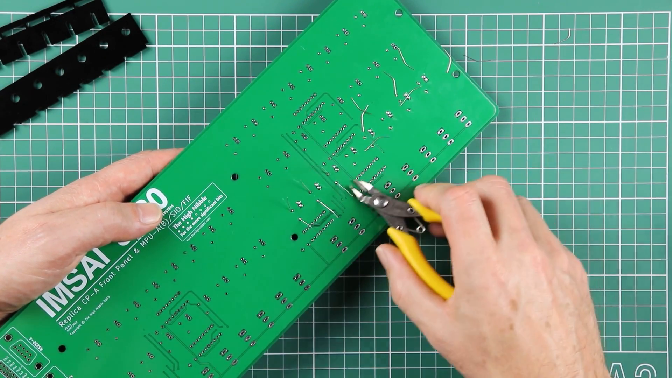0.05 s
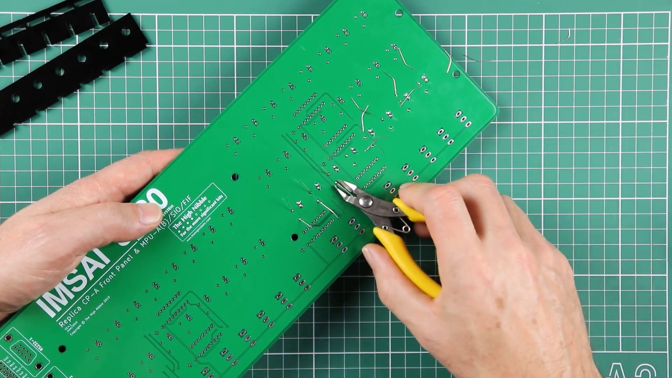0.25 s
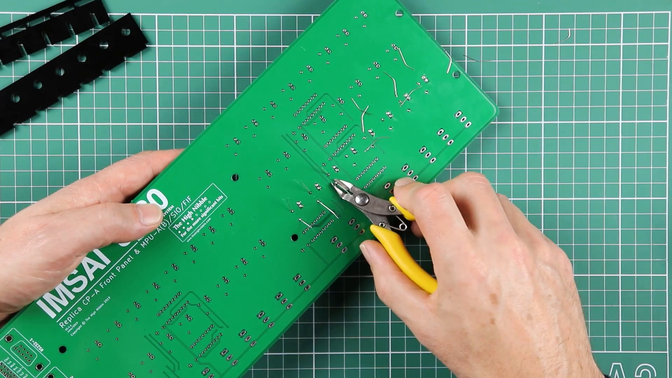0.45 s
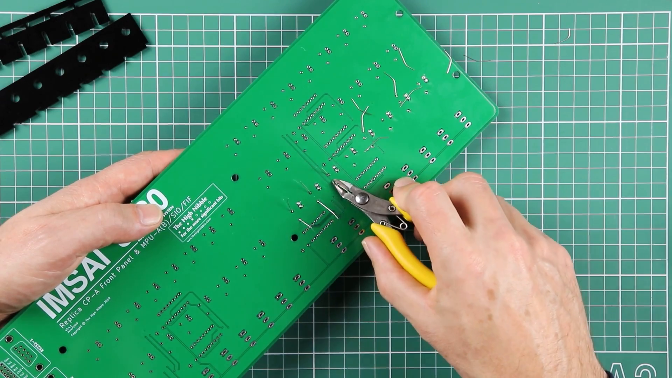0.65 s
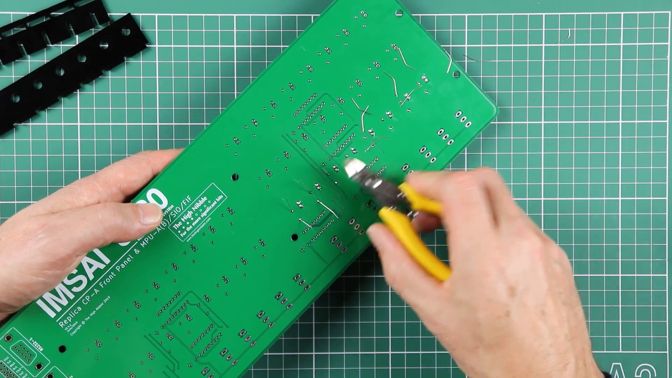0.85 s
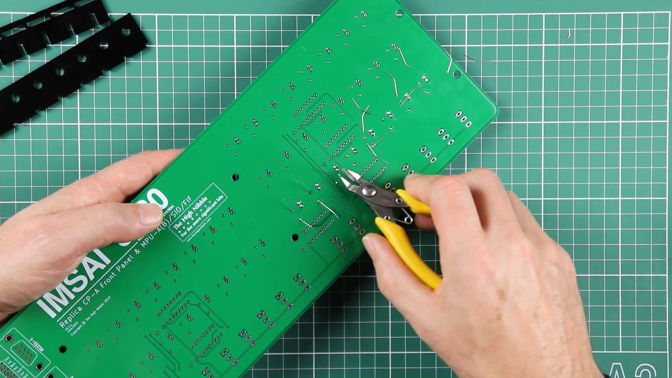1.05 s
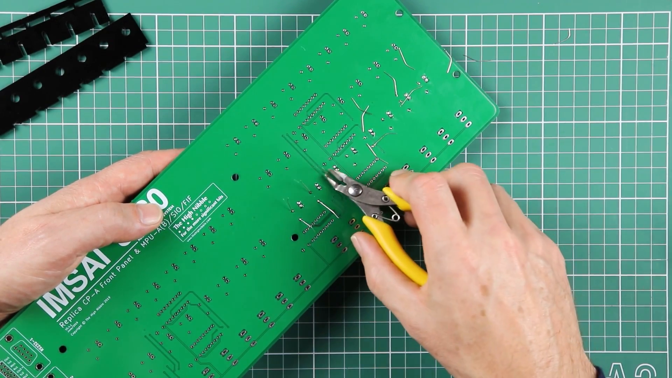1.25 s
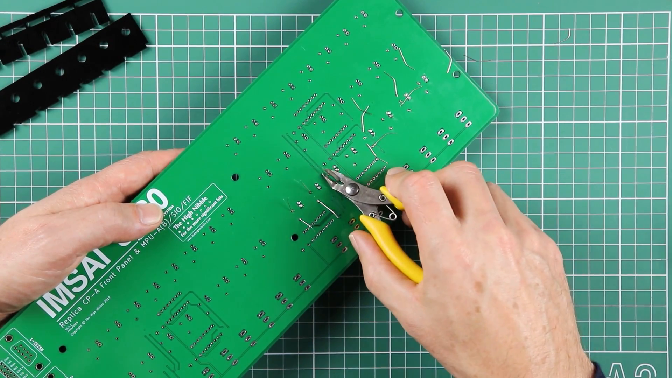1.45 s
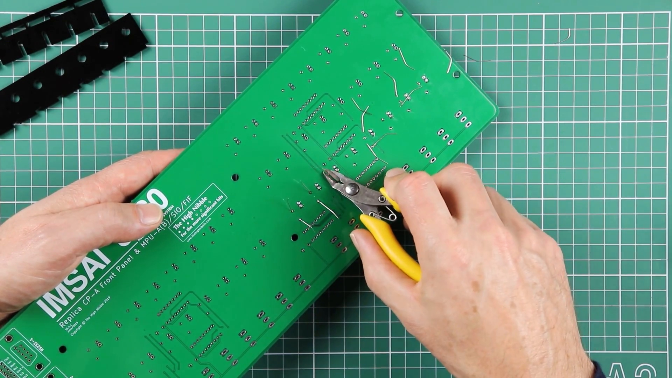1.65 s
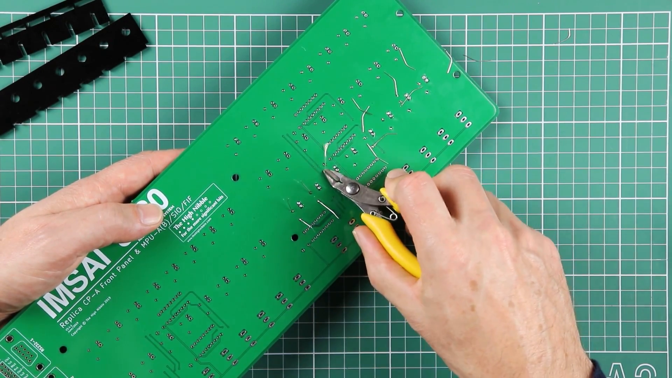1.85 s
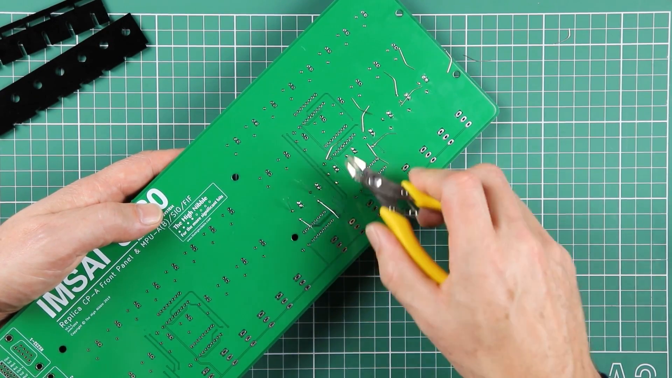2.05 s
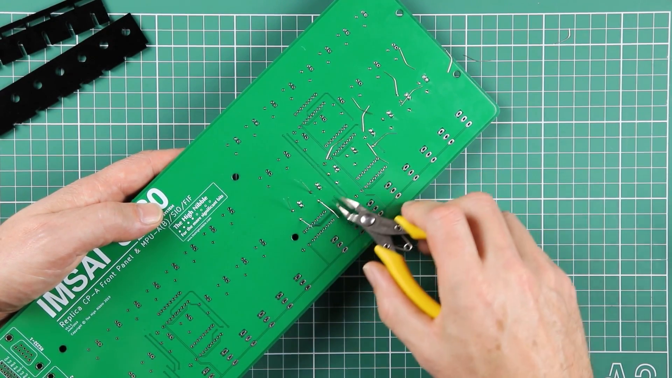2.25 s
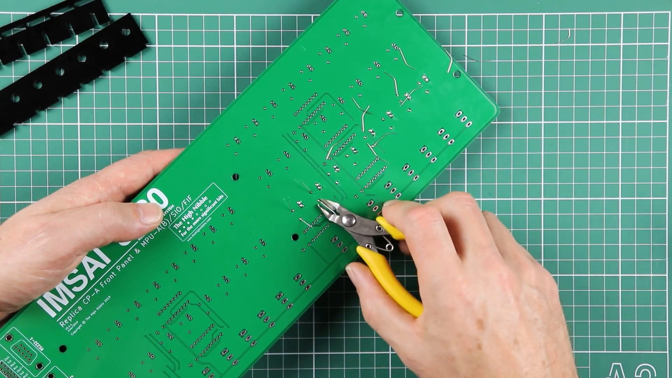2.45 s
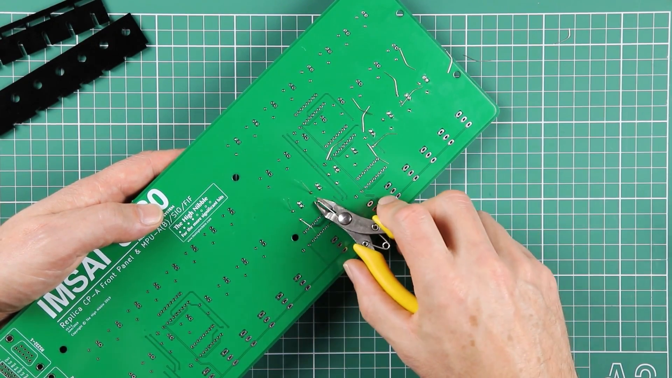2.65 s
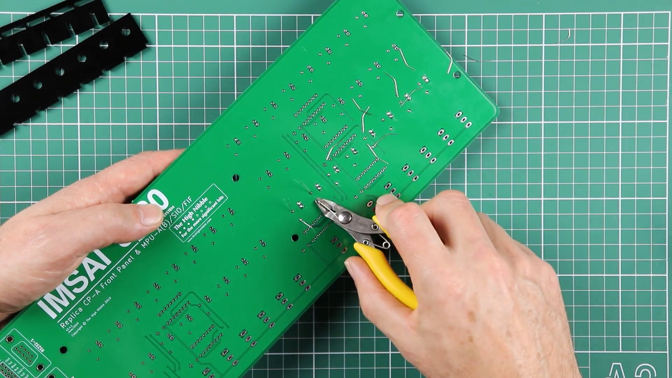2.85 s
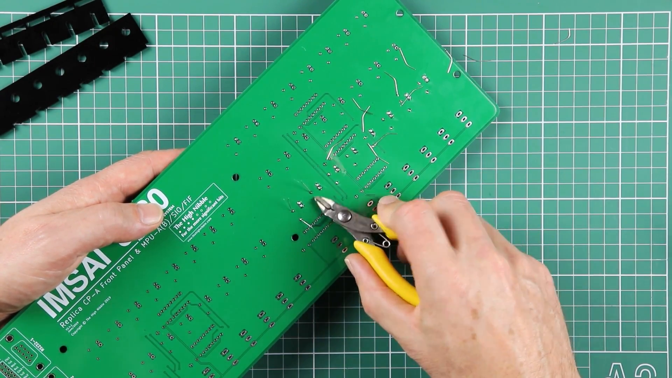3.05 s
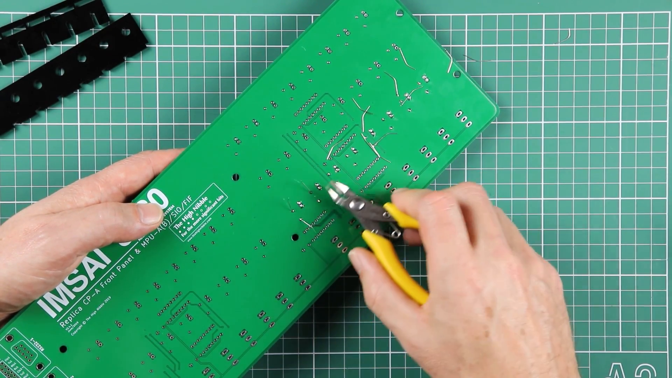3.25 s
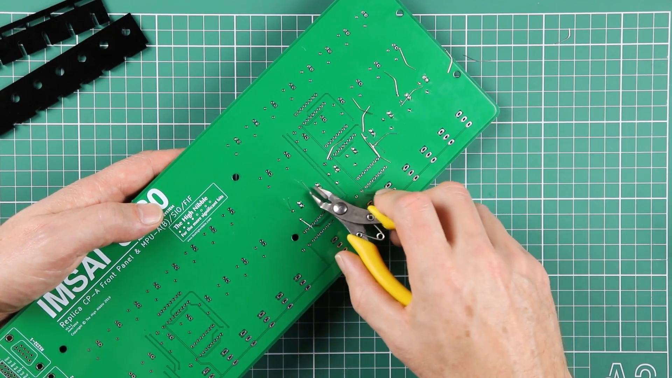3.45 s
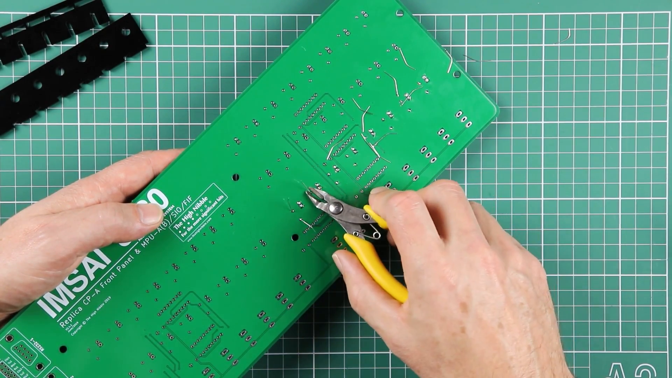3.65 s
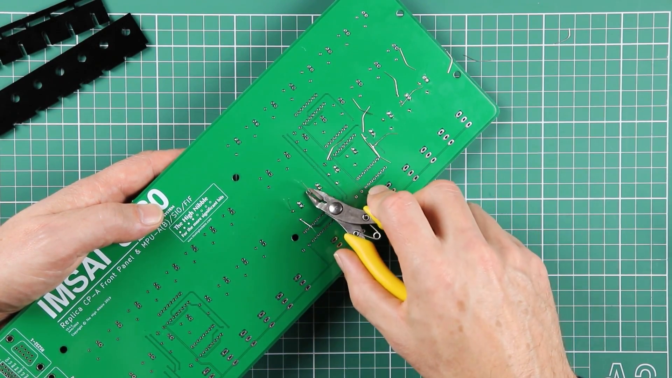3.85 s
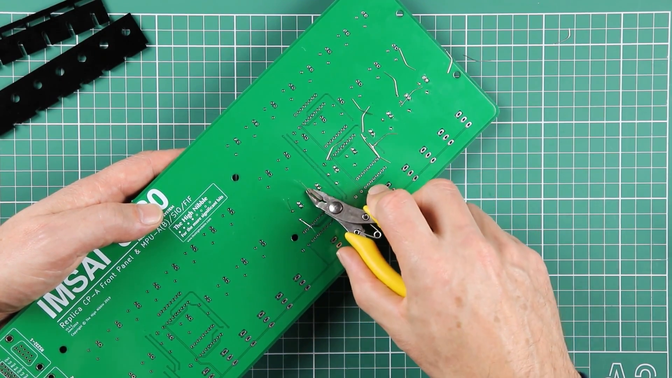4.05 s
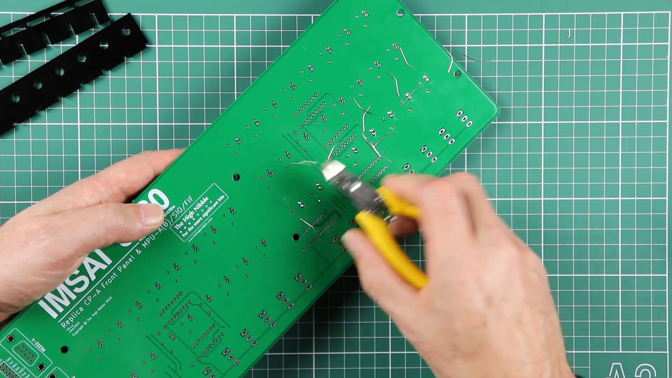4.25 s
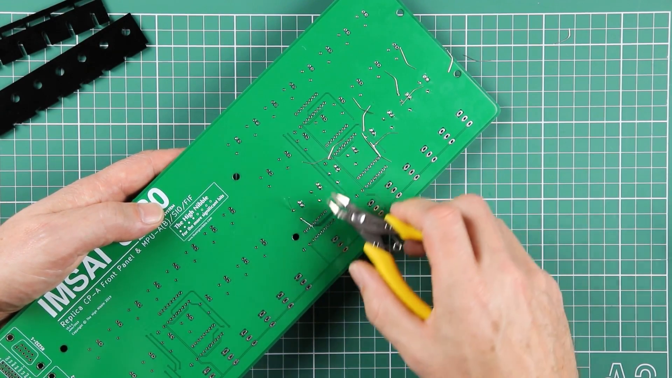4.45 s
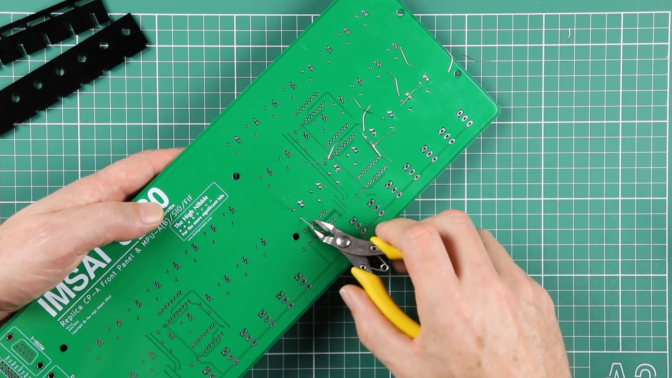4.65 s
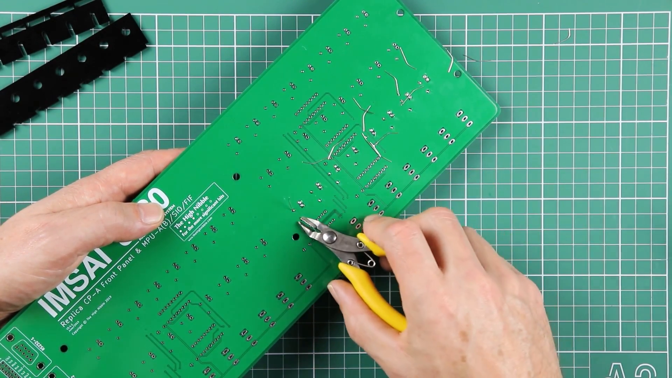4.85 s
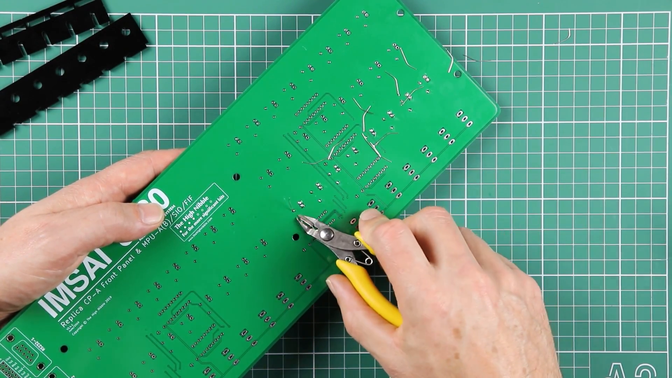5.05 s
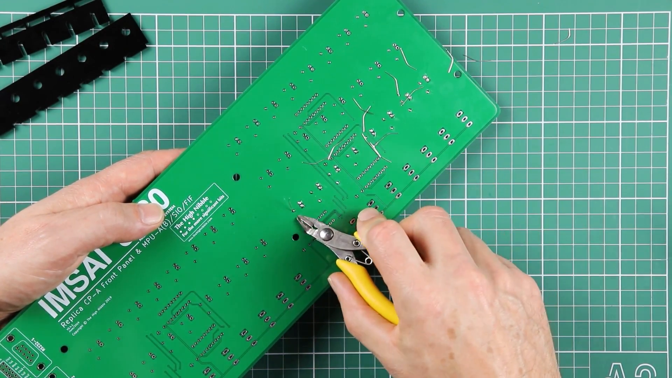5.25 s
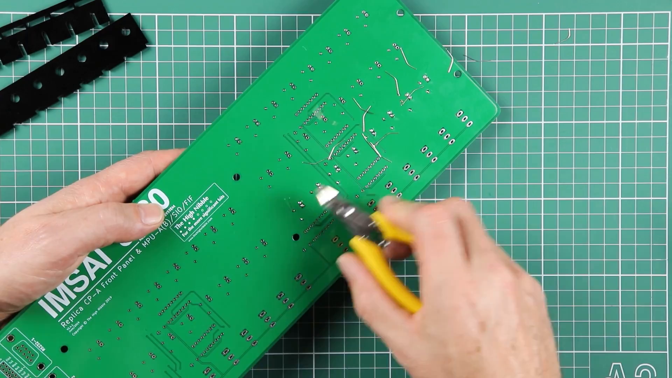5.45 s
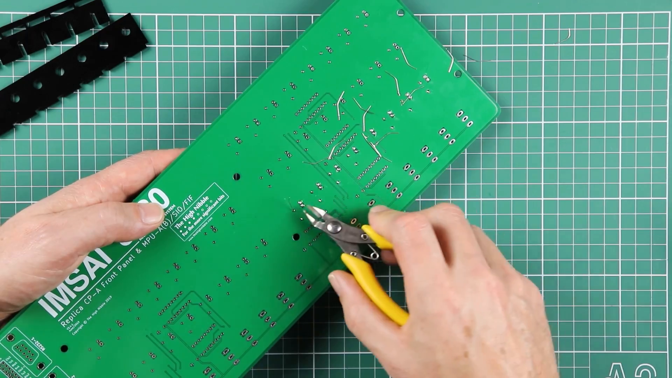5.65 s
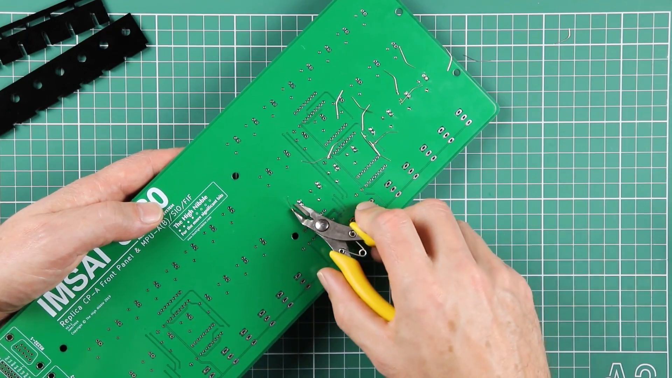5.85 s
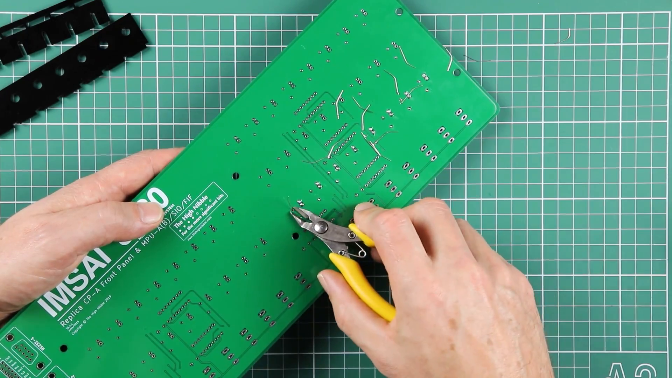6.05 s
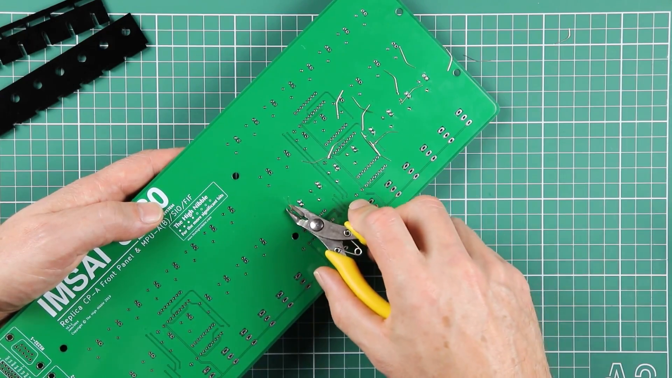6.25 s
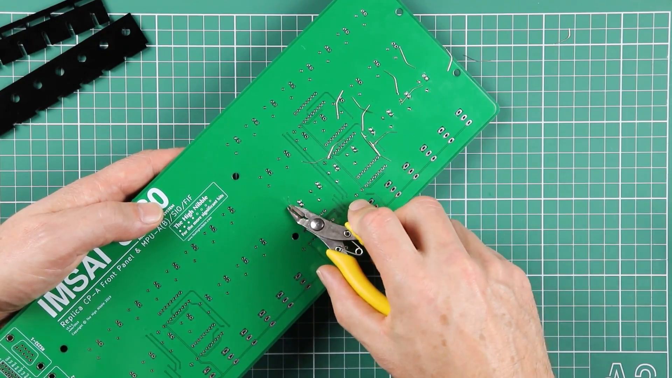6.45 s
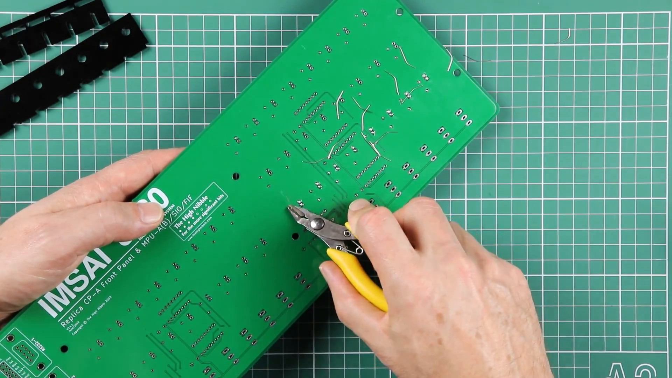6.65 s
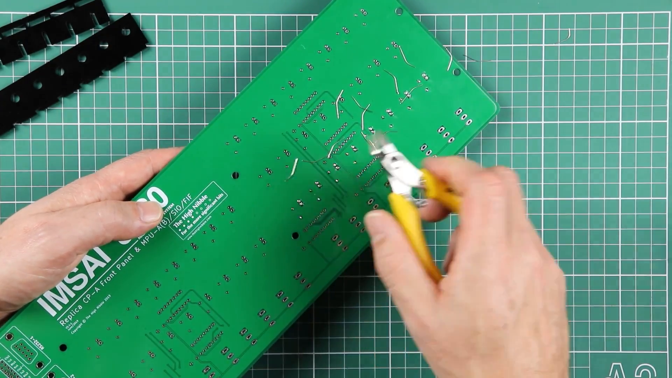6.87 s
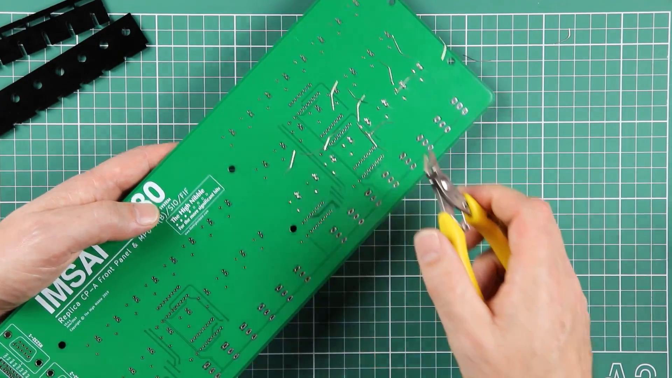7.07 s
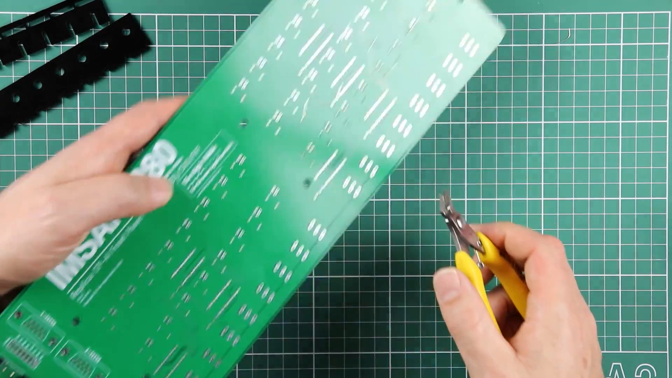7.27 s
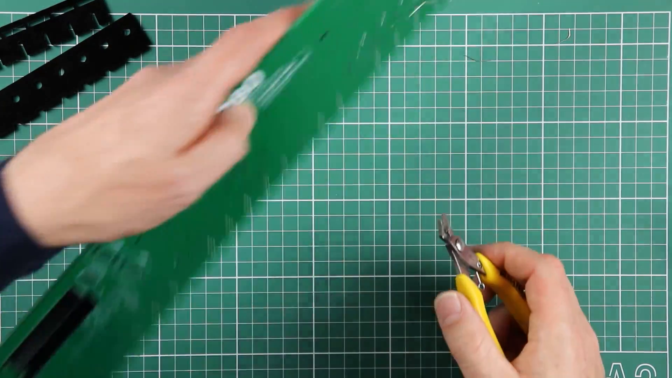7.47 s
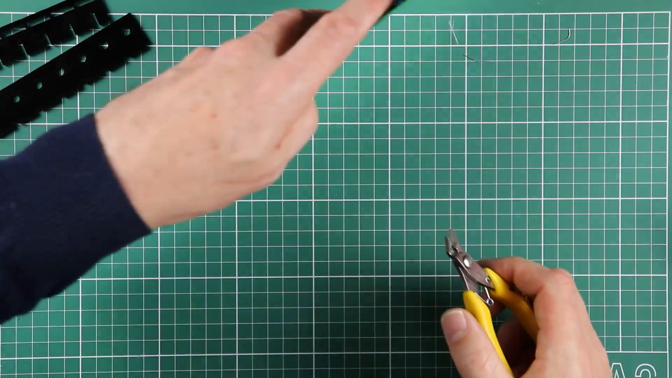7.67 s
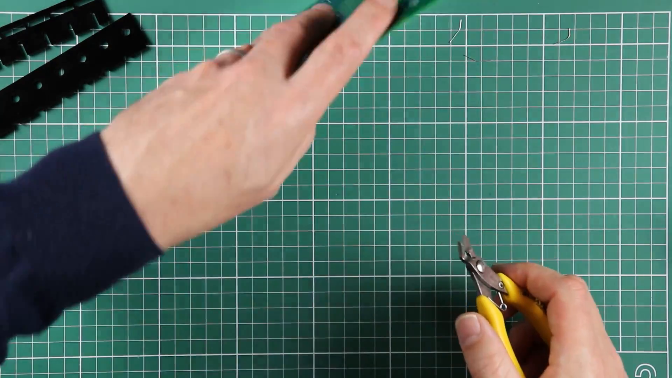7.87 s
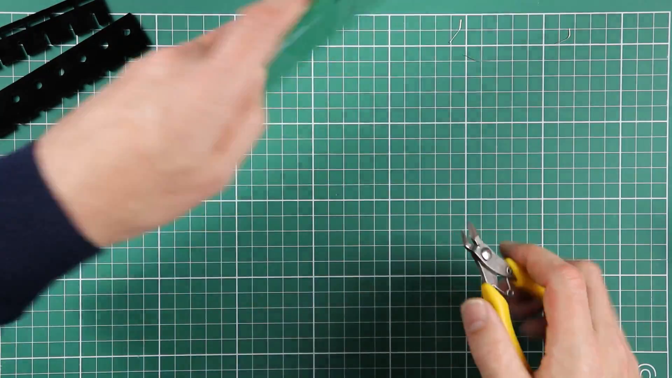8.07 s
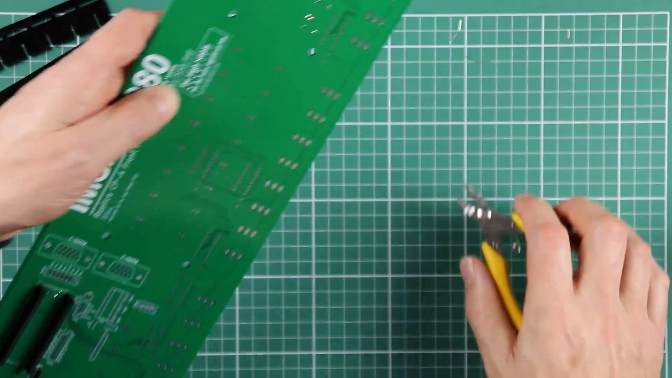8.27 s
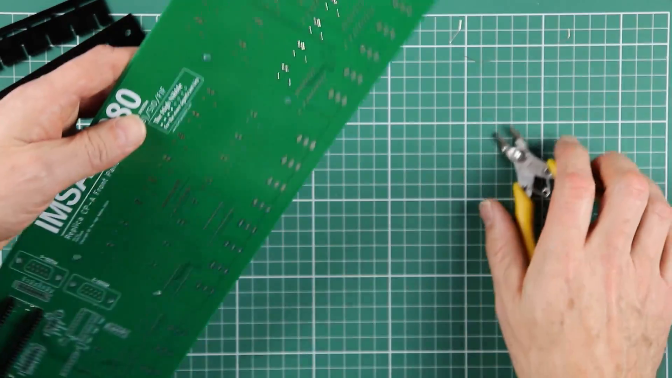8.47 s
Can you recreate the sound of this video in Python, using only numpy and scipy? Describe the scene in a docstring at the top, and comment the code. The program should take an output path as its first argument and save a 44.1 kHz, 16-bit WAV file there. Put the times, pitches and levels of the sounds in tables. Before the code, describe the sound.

Close, crisp snips of wire leads on a thin circuit board, alternately softer and louder, with bright metallic offcut ticks, then brushing and light plastic taps.

```python
"""On a workbench, close to a microphone, side cutters snip component leads off a hand-held circuit board.
Each cut is a crack plus decaying tones of board and steel; knocks ring the board and offcuts tick and skitter.
At the end the board is tipped out and the cutters are laid down. Filtered noise makes an earlier cut's dying echo
at the start, the brushing hands, hiss and rumble; random echoes make the room. A noise suppressor dims each
band of sound when it gets quiet."""
import sys
import numpy as np
from scipy import signal
from scipy.fft import rfft, irfft, next_fast_len
from scipy.io import wavfile
from scipy.ndimage import uniform_filter1d, minimum_filter1d

SR = 44100
rng = np.random.default_rng(int(sys.argv[2]) if len(sys.argv) > 2 else 0)


def wrap_up_sound(samples):
    """Save the sound to the file named by the first command line argument, as 16-bit audio."""
    columns = np.atleast_2d(samples).T
    # keep every value between -1 and 1, then stretch to whole-number steps
    tamed = np.clip(columns, -1, 1)
    steps = np.round(tamed * 32767).astype(np.int16)
    wavfile.write(sys.argv[1], SR, steps)


N = 375291

# The cuts. Each row: start in seconds, rough peak level in dB of the board's low, middle and high tones and of
# the steel's low and top tones, then the pitch in Hz that the spot favours among the board's low and middle
# tones and the steel's low and top tones.
CUTS = [(0.207, -30, -25.5, -23.5, -24.5, -25.5, 510, 1444, 4450, 8830),
        (0.794, -17.5, -25.5, -18.5, -22, -16, 698, 1466, 5600, 13040),
        (1.46, -24, -21.5, -18.5, -20, -22, 853, 1230, 4800, 8900),
        (1.916, -17, -17, -21.5, -26.5, -17, 703, 1548, 4400, 11140),
        (2.458, -31, -25, -22, -21.5, -22, 503, 1246, 4410, 9760),
        (3.068, -17.5, -21, -16.5, -21, -14, 693, 1915, 4410, 11100),
        (3.6142, -28, -25.5, -28, -35, -37, 747, 1190, 4350, 12870),
        (4.183, -17.5, -18.5, -18, -22, -14, 730, 1389, 6000, 11270),
        (4.863, -27.5, -21.5, -23, -24.5, -26.5, 852, 1240, 4600, 8620),
        (5.388, -17.5, -21, -21.5, -28, -17, 710, 1900, 6520, 12400),
        (5.907, -32, -31.5, -39, -35, -39, 560, 1460, 4300, 13000),
        (6.706, -18.5, -21.5, -19.5, -24, -12, 689, 1320, 6590, 12520)]
# The tones (modes) of the circuit board. Each row: pitch in Hz, width in Hz (wider dies faster), relative level in dB.
BOARD = [(391, 28, -4), (440, 80, -3.5), (521, 24, -11.5), (610, 21, -6.5), (722, 170, -5), (775, 40, -1.5),
         (896, 56, -5.5), (1240, 120, -2.5), (1515, 71, -8), (1797, 180, -10.5), (2000, 120, -8),
         (2500, 190, -11.5), (2830, 200, -6), (3247, 120, -9)]
# The tones of the steel cutters and offcuts. Each row: pitch in Hz, width in Hz, relative level in dB.
STEEL = [(4367, 50, 4.5), (4580, 160, -8.5), (5030, 320, -8), (5420, 100, -4.5), (6660, 140, -2),
         (8920, 140, -1), (10930, 220, -16), (11400, 290, -2), (12100, 260, -1), (12400, 210, -8.5),
         (16000, 510, -15)]

BOARD_LOW = [mode for mode in BOARD if mode[0] < 1100]
BOARD_UPPER = [mode for mode in BOARD if mode[0] >= 1100]
STEEL_LOW = [mode for mode in STEEL if mode[0] < 8000]
STEEL_TOP = [mode for mode in STEEL if mode[0] >= 8000]
DAMPED = [[1], [.65]]  # gains of near sound and room sound, for blows damped by hand and board


def amp(db):
    """Turns decibels into a gain."""
    return 10 ** (np.asarray(db) / 20)


def read(points, hz):
    """Reads a value between the points of a curve, on a logarithmic pitch axis."""
    point_hz, value = np.transpose(points)
    return np.interp(np.log(hz + 1), np.log(point_hz + 1), value)


def along(s, db):
    """A level curve as a gain for every sample, practically silent outside its span."""
    level_db = np.interp(np.arange(N) / SR, s, db, -150, -150)
    return uniform_filter1d(amp(level_db), size=600)


def gesture(start, hold, db, rise, fall):
    """A gain that climbs 30 dB to its level at start, holds, and sinks 30 dB again."""
    end = start + abs(hold)
    faint_db = db - 30
    return along([start - rise, start, end, end + fall], [faint_db, db, db, faint_db])


def noise(colour):
    """Steady noise whose strength at each pitch follows a curve in dB per Hz."""
    size = next_fast_len(N)
    white = rfft(rng.standard_normal(size)) * np.sqrt(SR / 2)
    shape = amp(read(colour, np.fft.rfftfreq(size, 1 / SR)))
    return irfft(white * shape, size)[:N]


def evened(x):
    """Scales a signal to an average (rms) level of 1."""
    return x / np.sqrt(np.mean(x ** 2))


def smooth_patches(shape, across, along_time):
    """Random patches over pitch and time, smoothed both ways and scaled to rms 1."""
    patches = uniform_filter1d(rng.standard_normal(shape), size=across, axis=0)
    return evened(uniform_filter1d(patches, size=along_time, axis=1))


def add(mix, s, sound):
    """Mixes a sound in at s seconds."""
    part = mix[:, round(s * SR):][:, :sound.shape[1]]
    part += sound[:, :part.shape[1]]


def ring(modes, peak_db, rise_ms, crack, favoured_hz=None, focus_db=0., reach=10):
    """A blow rings decaying tones and cracks broadly; returns the near sound and an equally strong room click."""
    t = np.arange(3000) / SR
    hz, width, db = np.transpose(modes)[:, :, None]
    if favoured_hz:
        db = db - focus_db * abs(np.log2(hz / favoured_hz))  # focus is in dB per octave away
    level_draw, pitch_draw, phase = rng.standard_normal((len(hz), 3)).T[:, :, None]
    onset = 1 - np.exp(-(t * 1000 / max(rise_ms, .1)) ** 2)
    swing = amp(db + 0.61 * level_draw) * np.sqrt(width) * np.exp(-np.pi * width * t)
    tones = np.sin(2 * np.pi * (hz * (1 + 0.0094 * pitch_draw) * t + phase))
    rung = onset * (swing * tones).sum(0)

    # the reach, a multiple of the favoured pitch, can hold down the top of the crack
    low_edge = .9 * hz.min()
    reach_hz = max(reach * (favoured_hz or SR), 1.5 * low_edge)
    high_edge = min(1.03 * hz.max(), reach_hz)
    band = signal.butter(2, [low_edge, high_edge], "band", fs=SR, output="sos")
    fizz = onset * np.exp(-t / 0.003) * rng.standard_normal(len(t))
    cracked = signal.sosfilt(band, fizz)

    level = amp(peak_db - 23.5)  # a ring this short has its mean level well under its peak
    near = level * evened(evened(rung) + crack * evened(cracked))

    # the room gathers sound from all sides of the object, where the modes fill each other's gaps
    wide = signal.butter(1, [.8 * low_edge, min(1.25 * high_edge, .45 * SR)], "band", fs=SR)
    click = signal.lfilter(*wide, signal.lfilter(*wide, t == 0))
    return np.array([near, level * evened(click)])


def cuts(out):
    """Each snapping lead strikes board and steel, ringing their tones near the spot's favoured pitches."""
    middle = [mode for mode in BOARD_UPPER if mode[0] < 2200]
    high = [mode for mode in BOARD_UPPER if mode[0] >= 2200]
    for s, low_db, middle_db, high_db, jaws_db, top_db, low_hz, middle_hz, jaws_hz, top_hz in CUTS:
        add(out, s, ring(BOARD_LOW, low_db, 1.0, .25, low_hz, focus_db=1.0))
        add(out, s, ring(middle, middle_db, 1.0, 0.93, middle_hz, focus_db=12.0))
        add(out, s, ring(high, high_db, 0.27, 0.63))
        add(out, s, ring(STEEL_LOW, jaws_db, 0.9, 0.96, jaws_hz, reach=0.79, focus_db=15.5))
        add(out, s, ring(STEEL_TOP, top_db, 0.44, 1.0, top_hz, reach=1.2, focus_db=15.5))


def knocks(out):
    """The jaws or the bench knock the board, which rings with little crack and feeds the room less."""
    # Each row: start in seconds, rough peak level in dB of the board's low tones and of its upper tones,
    # favoured low pitch in Hz, favoured upper pitch in Hz.
    blows = [(0.304, -41, -34.5, 504, 1210), (0.83, -27, -24.5, 900, 1470), (0.99, -61, -44.5, 900, 2450),
             (1.097, -50.5, -42.5, 1000, 1960), (1.985, -33, -30.5, 545, 1430),
             (2.54, -47.5, -41.5, 560, 1130), (3.1015, -26.5, -22.5, 410, 1900),
             (3.6, -35.5, -51, 410, 1870), (3.849, -56.5, -45, 885, 1250), (4.208, -27, -24, 790, 1356),
             (4.232, -62.5, -34, 784, 1350), (5.4267, -34, -24, 643, 1930),
             (5.744, -45.5, -46.5, 1000, 1150), (6.097, -37, -27.5, 388, 2080),
             (6.185, -39.5, -32.5, 398, 1890), (6.734, -41, -26.5, 600, 1640),
             (6.882, -37.5, -39, 900, 1240), (7.687, -46, -42.5, 918, 2830)]
    for s, low_db, upper_db, low_hz, upper_hz in blows:
        add(out, s, ring(BOARD_LOW, low_db, 0.86, 0.094, low_hz, focus_db=8.0) * DAMPED)
        add(out, s, ring(BOARD_UPPER, upper_db, 0.26, 0.11, upper_hz, focus_db=11.5) * DAMPED)
        add(out, s, ring(STEEL_LOW[:2], upper_db - 17.5, 0.93, .15))  # the resting jaws ring along


def ticks(out):
    """The clearest bounces of offcuts: small bits of steel ring mostly their top tones."""
    # Each row: start in seconds, rough peak level in dB of the steel's top tones and of its low tones,
    # favoured pitch in Hz.
    bounces = [(0.432, -55.5, -80, 11000), (0.83, -33.5, -60, 8700), (0.871, -31.5, -46.5, 8850),
               (0.9099, -37, -49, 10800), (0.9867, -38.5, -67, 12000), (0.99, -32.5, -52.5, 12000),
               (1.025, -33.5, -61.5, 12300), (1.041, -45.5, -69, 12000), (1.047, -33, -67, 12100),
               (1.0622, -43, -67, 12000), (1.067, -37, -63, 11500), (1.9448, -21, -52, 8900),
               (1.9865, -29, -39.5, 12500), (2.0093, -28.5, -46, 9200), (2.0427, -38.5, -74.5, 8850),
               (2.7813, -50, -71, 12500), (3.1289, -28, -40, 8640), (3.1396, -29, -49.5, 8890),
               (3.1905, -34.5, -49, 9040), (3.2245, -38, -64, 8780), (4.2573, -21, -45.5, 8750),
               (4.294, -37, -52, 9650), (4.383, -41.5, -50, 9000), (4.4481, -40.5, -51.5, 9200),
               (5.4448, -26.5, -39, 8700), (5.48, -30, -40, 8830), (5.5133, -32, -45.5, 11400),
               (5.517, -26, -43.5, 11200), (5.549, -37, -50, 11400), (5.586, -39, -52, 12000),
               (5.61, -50, -51, 9000), (6.099, -44, -61, 11400), (6.225, -44.5, -72.5, 9300),
               (6.785, -31, -39, 8900), (6.8884, -40.5, -49, 8900), (6.9463, -37, -62, 11430),
               (7.5254, -41, -73, 11450), (7.552, -36, -59, 10800), (7.581, -39, -73, 12000),
               (7.606, -31.5, -66, 11200), (7.6688, -41, -46, 11100), (7.6868, -33, -41.5, 8900)]
    for s, top_db, low_db, hz in bounces:
        bright = ring(STEEL_TOP, top_db, 0.5, 1.0, hz, reach=1.5, focus_db=17.5)
        dull = ring(STEEL_LOW, low_db, 0.31, 2.0)
        add(out, s, (bright + dull) * DAMPED)


def skitter(count=12):
    """Offcuts skitter on: a dozen kinds of small bounce fall at random moments, some a little larger."""
    # Each row: start in seconds, length in seconds, typical peak level in dB.
    runs = [(0.861, 0.089, -51), (1.96, 0.101, -45), (3.162, 0.117, -49.5), (4.419, 0.074, -53),
            (5.547, 0.089, -50), (7.506, 0.206, -48.5), (7.776, 0.057, -64.5)]
    bounces_per_s, rise_s, fall_s = 240, .004, 0.007
    level = sum(amp(db) * gesture(s, length, 0, rise_s, fall_s) for s, length, db in runs)
    falls = rng.random(N) < bounces_per_s / SR
    size = level * amp(0.5 * rng.exponential(1, N)) * falls
    kind = rng.integers(0, count, N)
    pitch_hz = 12000 * 2 ** (0.16 * rng.standard_normal(count))
    out = np.zeros((2, N))
    for k, hz in enumerate(pitch_hz):
        bounce = ring(STEEL_TOP, 0, 0.2, 0.2, hz, focus_db=6.5) + ring(STEEL_LOW, -14.5, 0.32, 0.65)
        out += signal.oaconvolve((size * (kind == k))[None], bounce, axes=1)[:, :N]
    return out


def ping(out):
    """One faint, thin ping of steel: a single decaying tone."""
    # The row: start in seconds, rough peak level in dB, pitch in Hz, width in Hz.
    faint_ping = (7.088, -52, 4195, 80)
    s, db, hz, width = faint_ping
    add(out, s, ring([(hz, width, 0)], db, 0.83, 0))


def snaps(out):
    """Dry, broad clicks too short to ring: a spike with a fast-dying fizz."""
    # Each row: start in seconds, peak level in dB.
    clicks = [(0.12, -42), (1.0995, -44), (7.6362, -23.5), (7.6875, -29), (7.742, -39), (7.787, -46.5),
              (7.7985, -36)]
    band_hz, decay_ms = (1500, 12000), .5
    t = np.arange(400) / SR
    for s, peak_db in clicks:
        fizz = 0.21 * np.exp(-t * 1000 / decay_ms) * rng.standard_normal(len(t))
        click = signal.lfilter(*signal.butter(1, band_hz, "band", fs=SR), (t == 0) + fizz)
        add(out, s, amp(peak_db) * click / abs(click).max() * [[1], [.4]])  # near, and less for the room


def grips(out):
    """The cutters are laid down one grip after the other, and each plastic grip rings briefly."""
    # Each row: start in seconds, rough peak level in dB of each of the three tones.
    landings = [(8.3256, -30.5, -35.5, -40.5), (8.403, -36.5, -32.5, -62)]
    # The tones of the grips. Each row: pitch in Hz, width in Hz.
    plastic = [(1190, 130), (1620, 97), (3510, 140)]
    for s, *levels in landings:
        grip = sum(ring([mode + (0,)], db, 1.0, 0.17) for mode, db in zip(plastic, levels))
        add(out, s, grip * [[1], [.2]])  # the mat soaks up much of the room's share


def bench_work():
    """Gathers all the blows, as near sound and as the sound that feeds the room."""
    out = np.zeros((2, N))
    cuts(out)
    knocks(out)
    ticks(out)
    ping(out)
    snaps(out)
    out += skitter()
    low_ring = signal.lfilter(*signal.butter(2, 3500, fs=SR), out[0])
    out[1] += 0.49 * low_ring  # the room hears the board's ring too
    grips(out)
    no_bass = signal.butter(6, 290, "high", fs=SR, output="sos")  # a thin board radiates no bass
    return signal.sosfilt(no_bass, out)


def echoes():
    """Sparse echoes of random sign; each band of pitch dies at its own speed, unevenly."""
    # How long echoes take to die by 60 dB. Each row: pitch in Hz, time in seconds.
    decay = [(300, 0.57), (2500, 0.71), (6000, 0.37), (12000, 0.41)]
    # How strong the echoes are. Each row: pitch in Hz, relative level in dB.
    colour = [(400, -10.5), (900, -3), (2500, -5.5), (4000, -10.5), (8000, -2), (14000, -8.5)]
    taps = np.zeros(SR)
    at = np.arange(130, SR - 20, 12)
    taps[at + rng.integers(0, 12, len(at))] = rng.choice([-1., 1.], len(at))
    hz, t, z = signal.stft(taps, SR, nperseg=256)
    t60 = read(decay, hz)[:, None]
    early = 1 + 3.9 * np.exp(-t / 0.0082)  # bench and hands throw strong first echoes
    lumps = smooth_patches(z.shape, 10, 3)
    level_db = 1.6 * lumps + read(colour, hz)[:, None] - 23.5 - 60 * t / t60
    return signal.istft(z * early * amp(level_db), SR, nperseg=256)[1]


def room(x, count=6):
    """Six random sets of echoes take turns from cut to cut, so no single draw colours every tail alike."""
    starts = [row[0] - .01 for row in CUTS]
    stretch = np.searchsorted(starts, np.arange(N) / SR) % count
    return sum(signal.fftconvolve(x * (stretch == k), echoes())[:N] for k in range(count))


def brushing():
    """Fingers and sleeve slide in fine, uneven grains; the first row is the dying echo of an earlier cut."""
    # Each row: start in seconds, hold in seconds, bright scratch level in dB, dull swish level in dB.
    echo_and_strokes = [(0.0, 0.014, -75, -60.5), (7.499, 0.071, -65.5, -65), (7.605, 0.076, -61, -70.5),
                        (7.758, 0.13, -85, -63.5), (7.965, 0.03, -76.5, -65), (8.076, 0.035, -59, -64),
                        (8.148, 0.06, -65.5, -63.5), (8.269, 0.015, -58, -61.5), (8.334, 0.31, -78, -63.5)]
    # Colour of the bright scratch. Each row: pitch in Hz, relative density in dB per Hz.
    scratch_colour = [(2350, -49), (4000, -11), (6590, -4.5), (12300, 2), (14500, -3), (16000, -14)]
    # Colour of the dull swish. Each row: pitch in Hz, relative density in dB per Hz.
    swish_colour = [(250, -45), (360, 0.5), (600, -10.5), (3000, -11.5), (6000, -22.5)]
    rise_s, fall_s = 0.1, 0.069
    grain = amp(2.2 * evened(uniform_filter1d(rng.standard_normal(N), size=150)))
    hz, t, z = signal.stft(noise(scratch_colour) * grain, SR, nperseg=256)
    patches = smooth_patches(z.shape, 6, 8)  # the scratch catches in drifting patches of pitch
    gusts = evened(uniform_filter1d(rng.standard_normal(len(t)), size=6))
    patchy = signal.istft(z * amp(2.4 * patches + 3.0 * gusts), SR, nperseg=256)[1][:N]
    scratch = evened(patchy)
    swish = evened(noise(swish_colour) * grain)
    out = np.zeros(N)
    for s, hold, bright_db, dull_db in echo_and_strokes:
        blend = scratch * amp(bright_db) + swish * amp(dull_db)
        out += blend * gesture(s, hold, 0, rise_s, fall_s)
    return out


def swells():
    """Smooth treble hiss that rises and sinks slowly: noise kept to one band."""
    # Each row: start in seconds, hold in seconds, level in dB.
    rises = [(3.9, 0.34, -71.5), (6.3, 0.77, -71.5)]
    band = signal.butter(2, [5000, 12200], "band", fs=SR, output="sos")
    treble = evened(signal.sosfilt(band, rng.standard_normal(N)))
    return treble * sum(gesture(*row, 0.35, .15) for row in rises)


def bench_sway():
    """The bench is leaned on and sways at its lowest mode, a slightly wobbling low tone."""
    # Each row: start in seconds, hold in seconds, level in dB.
    leans = [(5.346, 0.032, -40.5), (5.458, 0.061, -53.5), (6.803, 0.042, -53.5)]
    sway_hz, rise_s, fall_s = 37, 0.051, 0.19
    wobble = 1 + 0.066 * evened(uniform_filter1d(rng.standard_normal(N), size=4000))
    sway = np.sqrt(2) * np.sin(2 * np.pi * np.cumsum(sway_hz * wobble) / SR)
    return sway * sum(gesture(*row, rise_s, fall_s) for row in leans)


def rumble():
    """Low, lumpy noise of bench and building, stronger once the hands move about."""
    # The level over time. Each row: time in seconds, level in dB.
    loudness = [(0.0, -62.5), (5.3, -61.5), (5.9, -59.5), (7.0, -59), (8.51, -60)]
    # Each row: pitch in Hz, relative density in dB per Hz.
    colour = [(12, -43.5), (20, -3.5), (44, -1.5), (80, -2), (107, -6.5), (200, -12), (270, -15.5),
              (320, -30), (420, -42.5), (560, -74)]
    wander_db = 3.5  # typical size of the slow random wander
    hz, t, z = signal.stft(noise(colour), SR, nperseg=4096)
    lumps = smooth_patches(z.shape, 2, 4)
    wander = evened(uniform_filter1d(rng.standard_normal(len(t)), size=3))
    low = signal.istft(z * amp(3.2 * lumps + wander_db * wander), SR, nperseg=4096)[1][:N]
    return evened(low) * along(*np.transpose(loudness))


def room_hiss():
    """Steady, faint noise that is weaker towards the treble."""
    # Each row: pitch in Hz, density in dB per Hz.
    colour = [(300, -100), (1000, -100), (3000, -105), (8000, -113), (12000, -117), (16000, -120)]
    return noise([(200, -140)] + colour)  # the extra point keeps out the bass


def scene():
    """Adds the near sounds, their echoes and the background."""
    near, all_round = bench_work()
    brushed = brushing()
    background = swells() + rumble() + bench_sway() + room_hiss()
    return (near + room(all_round) + brushed + background)[None]


def suppress(x, margin_db=5.5, range_db=9.0, release_db=82.0, spill=0.36):
    """Each band sinks near its own quietest level, partly following its neighbours; opens early, shuts slowly."""
    # The edges of the bands, in Hz.
    edges_hz = [320, 800, 2000, 3000, 4000, 5000, 7800, 9800, 12200]
    # How far a closed band is lowered. Each row: pitch in Hz, drop in dB.
    depth = [(500, 20.5), (2000, 30), (5000, 17.5), (11000, 12)]
    hz, t, z = signal.stft(x, SR, nperseg=1024, noverlap=768)
    bands = [(hz >= lo) & (hz < hi) for lo, hi in zip(edges_hz, edges_hz[1:])]
    power = [uniform_filter1d((abs(z[band]) ** 2).mean(0), size=3) for band in bands]
    level_db = 10 * np.log10(np.array(power) + 1e-20)
    quiet_db = np.percentile(level_db, 10, axis=1)[:, None]
    over_db = level_db - quiet_db - margin_db

    # 0 is fully open, 1 fully closed
    closed = np.clip(0.5 - over_db / range_db, 0, 1)
    closed = np.pad(closed, ((1, 1), (0, 0)), "edge")
    closed = (1 - 2 * spill) * closed[1:-1] + spill * (closed[:-2] + closed[2:])

    gain_db = np.zeros(z.shape)
    for band, share in zip(bands, closed):
        shut_db = -read(depth, hz[band].mean()) * share
        # the gain falls at most release_db each second
        held_db = np.maximum.accumulate(shut_db + release_db * t) - release_db * t
        early_db = -minimum_filter1d(-held_db, size=9)  # the highest gain nearby, so it opens early
        gain_db[band] = uniform_filter1d(early_db, size=7)
    return signal.istft(z * amp(gain_db), SR, nperseg=1024, noverlap=768)[1][:N]


def record(dry):
    """Noise suppression, then a steep filter that removes the highest treble."""
    treble_cut = signal.firwin(301, 15800, window=("kaiser", 9), fs=SR)  # edge in Hz
    return signal.oaconvolve(suppress(dry[0]), treble_cut, "same")[None]


dry = scene()
out = record(dry)
wrap_up_sound(out)
```